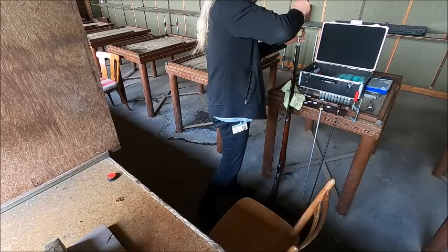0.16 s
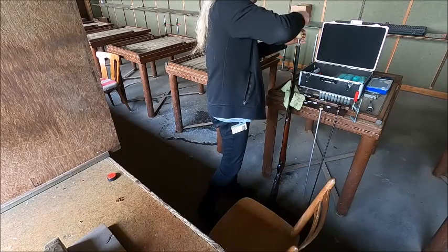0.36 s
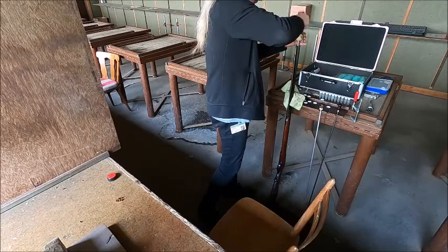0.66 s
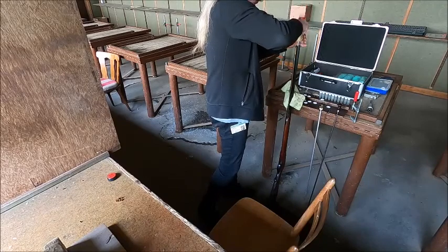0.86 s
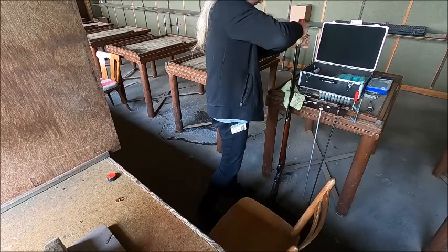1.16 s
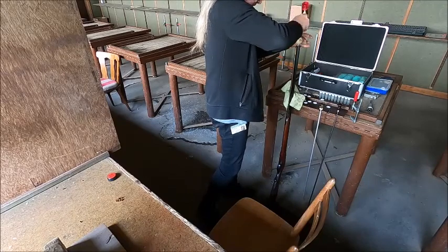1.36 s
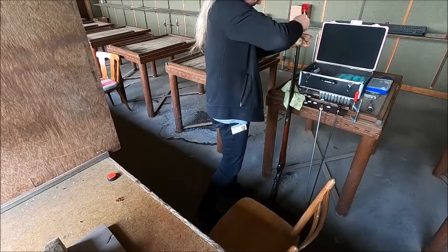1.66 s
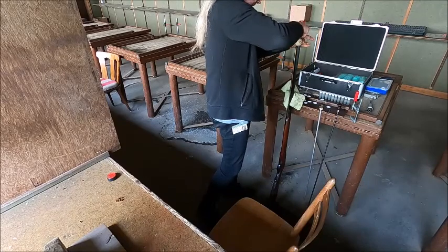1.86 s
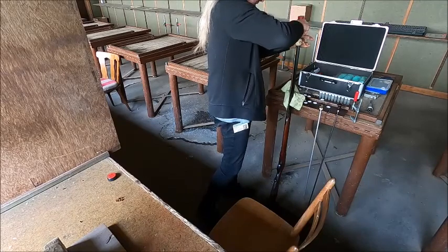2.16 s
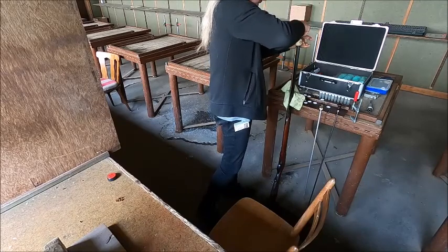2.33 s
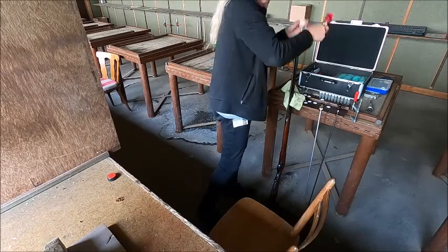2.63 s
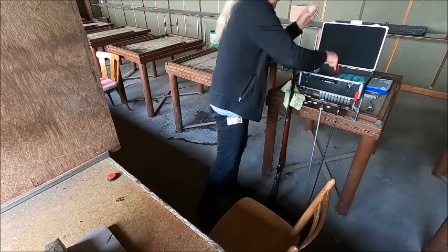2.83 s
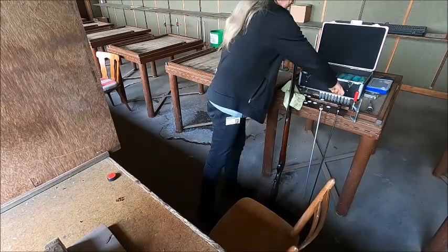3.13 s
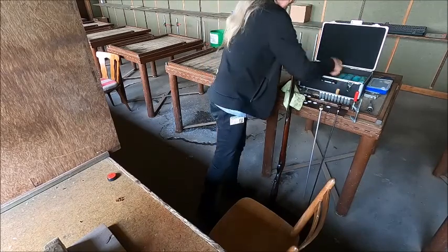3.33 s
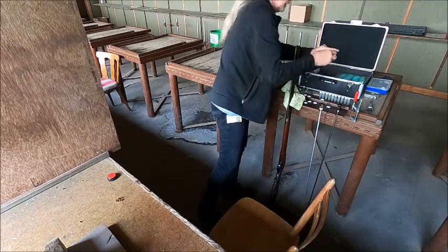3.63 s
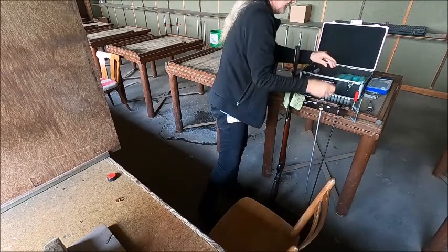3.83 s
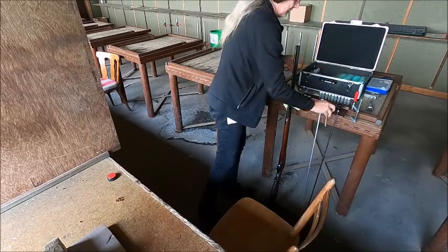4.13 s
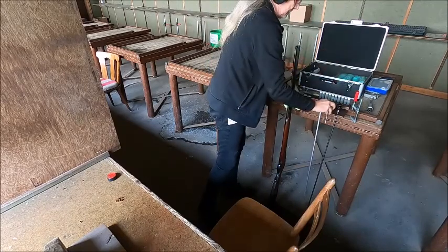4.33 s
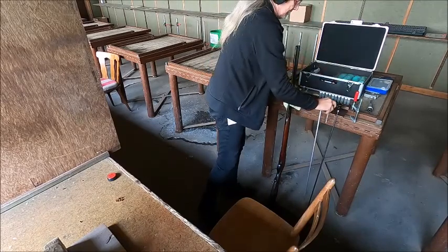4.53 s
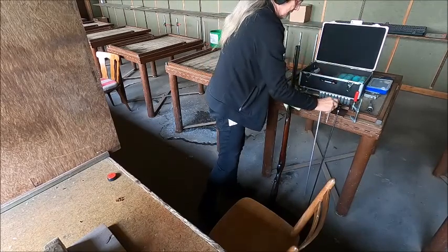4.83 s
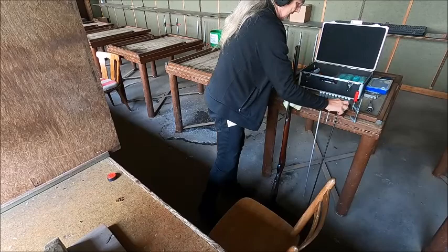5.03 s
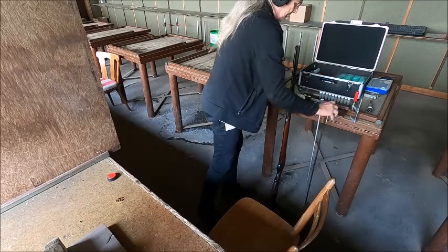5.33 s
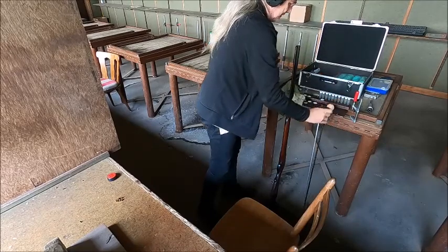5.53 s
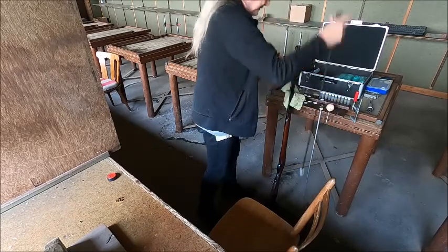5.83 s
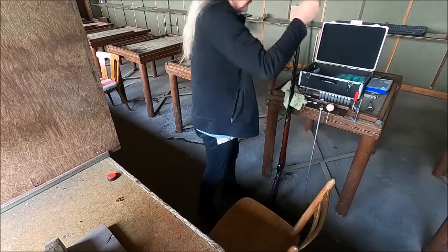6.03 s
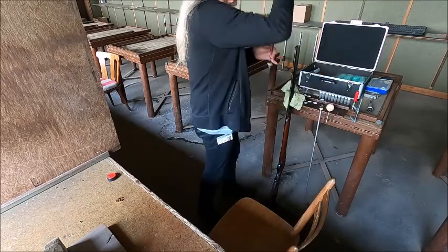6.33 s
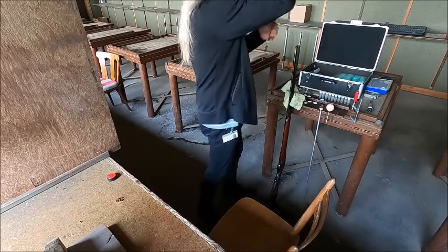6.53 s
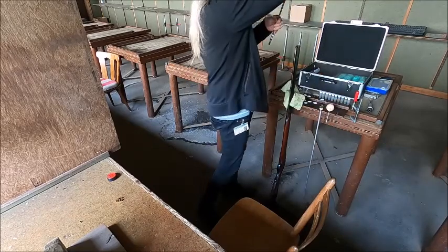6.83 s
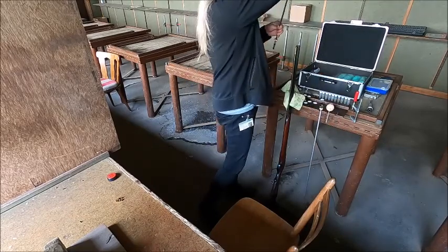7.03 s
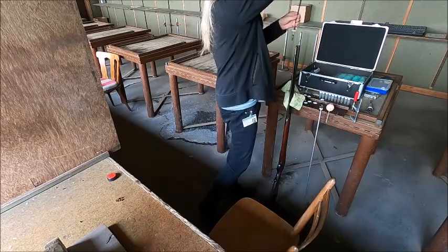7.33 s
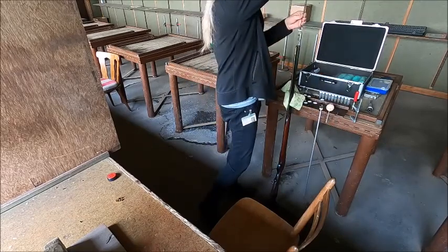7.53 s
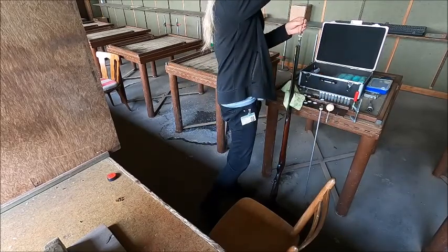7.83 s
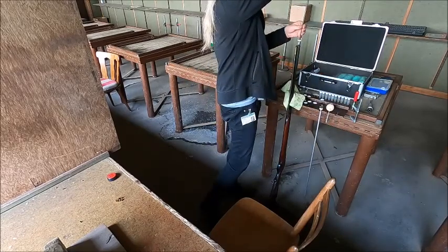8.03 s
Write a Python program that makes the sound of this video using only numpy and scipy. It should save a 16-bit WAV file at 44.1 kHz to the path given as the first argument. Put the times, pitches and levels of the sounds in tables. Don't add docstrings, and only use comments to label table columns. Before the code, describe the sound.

In a quiet wooden shed, a steady run of sharp knocks sinks in pitch, followed by a tool drop, loud lid clap, and light metallic clinks.

```python
import sys
import numpy as np
from scipy import signal
from scipy.fft import rfft, irfft, next_fast_len
from scipy.io import wavfile
from scipy.ndimage import uniform_filter1d

SR = 44100
rng = np.random.default_rng(int(sys.argv[2]) if len(sys.argv) > 2 else 0)


def put_to_file(sound):
    columns = np.atleast_2d(sound).T
    safe = np.clip(columns, -1, 1)
    whole_steps = np.round(safe * 32767)
    wavfile.write(sys.argv[1], SR, whole_steps.astype(np.int16))


def makeup_ratio(level_db):
    decades = np.asarray(level_db, float) / 20
    return 10 ** decades


N = 360278
LEAD = SR // 5

# (time [s], peak level [dB], knock pitch [Hz], thud level [dB], brightness [dB])
TAPS = [
    (0.1702, -13.5, 1614, -21, 7.5),
    (0.4556, -14, 1605, -33, 9),
    (0.749, -13.5, 1914, -21.5, 6),
    (1.0345, -14, 1700, -31, 4.5),
    (1.3243, -12, 1980, -14.5, 5),
    (1.6245, -20.5, 1590, -3, 15),
    (1.9166, -17, 2010, -9, 9),
    (2.3654, -12.5, 2020, -8, 3.5),
]
DROPS = [
    (3.3444, -16.5, 455, 20, 3.5),
    (3.379, -35.5, 452, 13.5, 14),
    (3.41, -33.5, 460, -1.5, 7.5),
]
LID_BLOWS = [
    (3.8526, -4.5, 2739, -15, 5),
    (3.908, -27.5, 2320, -20, 12),
    (3.926, -13, 1000, -12.5, -5),
]
KNOCKS = [
    (4.263, -21, 730, 1.5, 3.5),
    (4.308, -36, 670, -12, 13),
    (4.318, -40.5, 905, -12, 17.5),
    (4.4947, -24.5, 1400, -8, 3.5),
    (4.65, -32, 1062, 0.5, 3.5),
    (4.701, -48, 674, -13, 2),
    (5.3256, -25, 1500, -3, 3),
    (5.359, -34.5, 980, -3, 10),
    (5.385, -43.5, 400, 5, -9),
]


def unit(x):
    return x / np.sqrt(np.mean(x ** 2))


def band(x, lo_hz, hi_hz):
    sos = signal.butter(2, [lo_hz, min(hi_hz, SR / 2.2)], "band", fs=SR, output="sos")
    return signal.sosfilt(sos, x)


def fade(t, t60):
    return np.exp(-np.log(1000) * t / t60)


def coloured(shape, count):
    hz, db = np.transpose(shape)
    size = next_fast_len(count)
    f = np.arange(size // 2 + 1) * SR / size + 0.00085
    gain = makeup_ratio(np.interp(np.log(f), np.log(hz), db, -90, -90))
    return unit(irfft(rfft(rng.standard_normal(size)) * gain, size)[:count])


def pair(mid, side, alike):
    alike = np.clip(alike, 0, 1)
    opposed = np.sqrt((1 - alike) / 2) * side * np.array([[1], [-1]])
    return np.sqrt((1 + alike) / 2) * mid + opposed


def add(track, s, sound):
    i = int(s * SR) + LEAD
    track[i:i + len(sound)] += sound[:len(track) - i]


def walk(rate):
    k = int(SR / rate)
    steps = np.repeat(rng.standard_normal(N // k + 1), k)
    return unit(uniform_filter1d(uniform_filter1d(steps, k), k)[:N])


def swells(base_db, rows):
    power, t = np.full(N, makeup_ratio(base_db) ** 2), np.arange(N) / SR
    for s, db, rise in rows:
        span = slice(max(int(s * SR), 0), int((s + 9 * rise) * SR))
        u = (t[span] - s) / rise
        power[span] += (makeup_ratio(db) * u * np.exp(1 - u)) ** 2
    return np.sqrt(power)


def jolts(tap_db, drop_db, knock_db):
    tap_rise_s, drop_rise_s = 0.049, 0.02
    taps = [(s, db + tap_db, tap_rise_s) for s, db, *_ in TAPS]
    drops = [(s, db + drop_db, drop_rise_s) for s, db, *_ in DROPS]
    knocks = [(s, db + thud_db + knock_db, tap_rise_s) for s, db, _, thud_db, _ in LID_BLOWS + KNOCKS]
    return taps + drops + knocks


def background():
    # (time [s], level [dB], rise [s])
    gusts = [
        (-.05, -46, .07),
        (6.12, -62, .05),
        (6.235, -48, .075),
        (3.0, -63, .07),
    ]
    # (frequency [Hz], level [dB per Hz])
    hum_shape = [(59, -43), (100, -12), (118, -21.5), (144, -1), (200, 0), (231, -10.5), (300, -9.5),
                 (402, -22), (437, -19), (553, -33.5), (700, -25.5), (910, -55), (1540, -120)]
    # (frequency [Hz], level [dB per Hz])
    hiss_shape = [(240, -31), (400, 2), (545, -7), (848, -8), (1020, -3.5), (1390, -4), (1750, -7.5),
                  (3340, -9.5), (3870, -12.5), (4610, -12), (7270, -18.5), (8540, -25.5), (9900, -32.5),
                  (12900, -42.5), (21800, -120)]
    air_shape = [(15, -16.5), (35, -1.5), (75, 1), (120, -16.0), (200, -44)]  # (Hz, dB)

    def both(shape, alike):
        return pair(coloured(shape, N), coloured(shape, N), alike)

    air_gain = swells(-69.5, gusts + jolts(-41.5, -21, -48)) * makeup_ratio(1.8 * walk(12))
    hum_gain = swells(-65, jolts(-36.5, -34, -62)) * makeup_ratio(2 * walk(22))
    hiss_gain = makeup_ratio(-68.5 + 1.4 * walk(3.3))
    air = air_gain * both(air_shape, 0.85) * makeup_ratio([[1.6], [-1.6]])
    return air + hum_gain * both(hum_shape, 0.71) + hiss_gain * both(hiss_shape, 0.24)


def click(colour, bright_db, corner_hz):
    hz, db = np.transpose(colour)
    f = np.arange(513) * SR / 1024 + 1
    db = np.maximum(np.interp(np.log(f), np.log(hz), db), -70) + bright_db / (1 + (corner_hz / f) ** 3)
    cepstrum = irfft(np.log(makeup_ratio(db)))[:513] * np.r_[1, 2 * np.ones(511), 1]
    return irfft(np.exp(rfft(cepstrum, 1024)))


def spread(x, hz):
    width_hz = 900
    r = np.exp(-np.pi * width_hz / SR)
    c = -2 * r * np.cos(2 * np.pi * hz / SR)
    return signal.sosfilt([[r * r, c, 1, 1, c, r * r]], x)


def uncoloured(x):
    tone = rfft(x)
    fold = np.r_[1, 2 * np.ones(len(x) // 2 - 1), 1]
    cepstrum = irfft(np.log(np.abs(tone) + 1e-9))[:len(fold)] * fold
    return irfft(tone / np.exp(rfft(cepstrum, len(x))), len(x))


def blows(rows, modes, colour, knock_s, click_db, corner_hz, grit, grit_s, thud_hz, thud_s, trim_db):
    force_db = 2
    track, t = np.zeros(N + LEAD), np.arange(SR // 2) / SR
    short = t[:SR // 6]
    brief = short[:2048]
    for s, db, knock_hz, thud_db, bright_db in rows:
        chance = rng.standard_normal((len(modes), 2))
        noise = rng.standard_normal((2, len(short)))
        attack = 1 - np.exp(-t * knock_hz * 0.78)
        sound = np.sin(2 * np.pi * knock_hz * t) * attack * fade(t, knock_s)

        for (hz, mode_db, t60), (pitch, force) in zip(modes, chance):
            between = sum(min(hz, knock_hz) < other < max(hz, knock_hz) for other, *_ in modes)
            gain = -(-1) ** between * makeup_ratio(mode_db + force_db * force)
            sound += gain * np.sin(2 * np.pi * hz * (1 + 0.008 * pitch) * t) * fade(t, t60)

        contact = (brief == 0) + grit * noise[0, :len(brief)] * fade(brief, grit_s)
        contact = uncoloured(contact) * fade(brief, 4 * grit_s)
        plain = np.sqrt(np.sum(click(colour, 0, corner_hz) ** 2) * np.sum(contact ** 2))
        burst = signal.fftconvolve(spread(contact, knock_hz), click(colour, bright_db, corner_hz))
        sound[:len(burst)] += makeup_ratio(click_db) / plain * burst

        thud = unit(band(noise[1], *thud_hz)) * (1 - np.exp(-short / 0.0079)) * fade(short, thud_s)
        sound[:len(short)] += makeup_ratio(thud_db + 1) * thud
        add(track, s, makeup_ratio(db + trim_db) * sound)
    return track


def starter():
    # (time [s], peak level [dB], knock pitch [Hz], thud [dB], brightness [dB])
    earlier_tap = [
        (-.12, -13.5, 3800, -5.5, 0.0074),
    ]
    # (frequency [Hz], level [dB], t60 [s])
    starter_modes = [(1287, -28, 0.078), (1614, -16.5, 0.012), (2010, -23, 0.028), (2370, -11.5, 0.027),
                     (2800, 0, 0.0038)]
    # (frequency [Hz], level [dB])
    tap_colour = [(240, -58), (400, -28.5), (1240, -5), (1600, 0), (2050, -1.5), (2450, -11), (3050, -10),
                  (3500, -16.5), (4500, -16.5), (7670, -20), (9900, -30), (12900, -62.5), (21800, -120)]
    # (share of the ring pitch [1], level [dB])
    ring_skirt = [(0.82, -17), (1.0, -9.5), (1.1, -7.5)]
    first_ring_hz, last_ring_hz = 1023, 770
    track, rows = 0, earlier_tap + TAPS
    for row, depth in zip(rows, np.linspace(0, 1, len(rows))):
        ring_hz = first_ring_hz + (last_ring_hz - first_ring_hz) * depth ** 2.8
        ring = (ring_hz, -18.5 - 12 * depth, 0.031)
        stock = [(hz, db + 14 * depth * (hz < 500)) for hz, db in tap_colour]
        skirt = [(share * ring_hz, db) for share, db in ring_skirt]
        track = track + blows([row], starter_modes + [ring], sorted(stock + skirt), knock_s=0.013,
                              click_db=13.07, corner_hz=2500, grit=0.06 + 0.5 * depth ** 2, grit_s=0.018,
                              thud_hz=(130, 800), thud_s=0.039, trim_db=-0.5)
    return track


def light_touches():
    # (time [s], peak level [dB], knock pitch [Hz], thud level [dB],
    # brightness [dB])
    ticks = [(0.0808, -44.5, 1730, 4, 1), (0.4015, -39.5, 1870, -28, -26.5), (0.635, -39, 2400, -20, -15.5),
             (1.2194, -62.5, 1902, 4, 20), (1.5763, -36.5, 3340, 8.5, -18), (1.8477, -47.5, 1560, -10, 10),
             (1.8737, -46, 2940, -4, -13), (2.6587, -30, 3070, -0.5, 1), (2.7034, -31, 2810, -15, 7.5),
             (2.7105, -32, 2140, -30, 0), (2.718, -35, 2500, -34, 4.5), (2.749, -30.5, 1870, -26, -2),
             (2.7555, -37, 4080, -25, 11), (2.7636, -36.5, 3630, -20, 11), (2.7714, -39.5, 3500, -19, 12),
             (2.779, -42.5, 5000, -19, 8), (3.7692, -41, 3080, -42, 6),
             (2.65, -34, 4630, -32, 4.5),
        (3.334, -39, 500, 18, -4),
        (3.844, -38.5, 2500, -15.5, -20.5),
        (6.467, -40.5, 2820, -31, 11),
        (3.3465, -17.5, 2850, -21, -20.5),
        (5.333, -51, 5500, -19, 22.5),
    ]
    # (frequency [Hz], level [dB])
    tick_colour = [(530, -42.5), (900, -18.5), (1270, -17), (1930, -4.5), (2330, -7), (3970, -5.5),
                   (4350, -10), (5590, -14.5), (9900, -24.5), (12900, -54.5), (21800, -120)]
    grazes = [(s - 0.0098, db - 26, 1900, -19, -10) for s, db, *_ in TAPS]
    return blows(ticks + grazes, [], tick_colour, knock_s=0.012, click_db=12, corner_hz=4500,
                 grit=1.2, grit_s=0.012, thud_hz=(200, 1200), thud_s=0.013, trim_db=-1.4)


def birds():
    # (time [s], length [s], start pitch [Hz], end pitch [Hz], level [dB])
    whistles = [(0.123, 0.14, 3280, 3240, -54), (2.563, 0.12, 5550, 5400, -72),
                (2.927, 0.11, 4490, 4530, -69), (4.066, 0.13, 3780, 3860, -67),
                (4.107, 0.32, 4100, 3560, -65.5), (4.424, 0.19, 3020, 3000, -62),
                (4.549, 0.14, 3380, 3500, -65), (4.596, 0.16, 3020, 2800, -66),
                (7.486, .27, 4290, 4250, -67.5), (7.709, 0.21, 7050, 6970, -76),
                (6.771, 0.078, 4570, 4330, -62), (7.89, 0.18, 3810, 3740, -68.5)]
    track = np.zeros(N + LEAD)
    for s, length, start_hz, end_hz, db in whistles:
        u = np.linspace(0, 1, int(length * SR))
        wobble = uniform_filter1d(rng.standard_normal(len(u)), 60)
        waver = 1 + 0.32 * (3500 / start_hz) ** 2 * wobble
        turn = 2 * np.pi * np.cumsum((start_hz + (end_hz - start_hz) * u) * waver) / SR
        add(track, s, makeup_ratio(db) * np.sin(np.pi * u) * np.sin(turn))
    return track


def wood_creaks():
    # (time [s], length [s], pitch [Hz], level [dB], overtone level [dB])
    creaks = [
        (1.666, 0.19, 406.4, -57, -27),
        (2.195, 0.068, 433, -61, 0),
        (3.013, 0.1, 565, -80, -13),
        (3.206, 0.13, 488, -65, -20.5),
    ]
    multiples_db = [0, -5, -16, -3, -16, -8]
    track = np.zeros(N + LEAD)
    for s, length, hz, db, over_db in creaks:
        u = np.linspace(0, 1, int(length * SR))
        wobble = uniform_filter1d(rng.standard_normal(len(u)), 300)
        turn = 2 * np.pi * np.cumsum(hz * (1 + 0.3 * wobble)) / SR
        tone = sum(makeup_ratio(g + over_db * (k > 0)) * np.sin((k + 1) * turn) for k, g in enumerate(multiples_db))
        add(track, s, makeup_ratio(db) * np.sin(np.pi * u) * tone)
    return track


def scrapes():
    # (time [s], length [s], level [dB])
    drags = [
        (2.648, 0.12, -54.5),
        (6.181, 0.051, -60),
        (6.449, .26, -66.5),
        (8.114, 0.052, -56),
    ]
    # (frequency [Hz], level [dB per Hz])
    drag_shape = [(300, 12), (600, -28), (1200, -9.5), (1900, 2.5), (3000, -7.5), (4500, 1.5), (7000, -6.5),
                  (10000, -16.5), (13000, -10.5), (16000, -47.5)]
    stop_s = 0.063
    track = np.zeros(N + LEAD)
    for s, length, db in drags:
        t = np.arange(0, length + stop_s, 1 / SR)
        slip_force = np.repeat(rng.exponential(size=len(t) // 60 + 1), 60)[:len(t)]
        slips = uniform_filter1d(makeup_ratio(3.49 * slip_force), 40)
        press_db = np.interp(t, [0, length, length + stop_s], [0, 0, -35])
        add(track, s, makeup_ratio(db + press_db - 4.0) * unit(slips * coloured(drag_shape, len(t))))
    return track


def bench_drops():
    # (frequency [Hz], level [dB], t60 [s])
    bench_modes = [(105.8, 11, 0.17), (170.5, 6, 0.197), (203, -7.5, 0.96), (205.4, 12.5, 0.12),
                   (249, 12.5, 0.11), (327, -1, 0.14), (350, -0.5, 0.13), (405, -5.5, .12), (455.8, 7, 0.2),
                   (563, -9, 0.026), (893, -8, .04), (1256, -32.5, 1)]
    # (frequency [Hz], level [dB])
    drop_colour = [(240, -21.5), (400, -13.5), (457, -5.5), (640, -16), (1000, -14), (1500, -20),
                   (2140, -24), (2960, -30.5), (5630, -34.5), (9900, -57.5), (12900, -91.5), (21800, -120)]
    return blows(DROPS, bench_modes, drop_colour, knock_s=0.021, click_db=33.55, corner_hz=1800,
                 grit=0.16, grit_s=0.035, thud_hz=(140, 400), thud_s=0.045, trim_db=-14)


def lid_blows():
    # (frequency [Hz], level [dB], t60 [s])
    lid_modes = [(223.2, -33, 0.1), (446, -15.5, 0.021), (856, -13.5, 0.049), (1190, -43, 0.86),
                 (1335, -23, 0.02), (2174, -6, 0.034), (2750, -22.5, 0.026), (3840, -23, 0.02),
                 (4760, -32, .02)]
    # (frequency [Hz], level [dB])
    lid_colour = [(180, -49.5), (300, -11), (848, 4), (1300, 2.5), (1700, -1.5), (2400, 9.5), (3300, -7),
                  (4760, -13), (6500, -27), (9900, -54), (12900, -70), (21800, -120)]
    return blows(LID_BLOWS, lid_modes, lid_colour, knock_s=0.014, click_db=16.2, corner_hz=2540,
                 grit=0.25, grit_s=0.019, thud_hz=(160, 600), thud_s=0.072, trim_db=-11.5)


def case_knocks():
    # (frequency [Hz], level [dB], t60 [s])
    case_modes = [(225, -26.5, 0.18), (296, -20.5, 0.037), (420, -8.5, 0.042), (850, -24, 0.029),
                  (1062, -22, 0.04), (1310, -16.5, 0.015)]
    # (frequency [Hz], level [dB])
    knock_colour = [(180, -30), (300, -7), (848, 5.5), (1120, 5), (1280, 5), (1570, 2.5), (2190, -5),
                    (2770, -7), (3300, -10), (4760, -15), (9900, -39), (12900, -69), (21800, -120)]
    return blows(KNOCKS, case_modes, knock_colour, knock_s=0.014, click_db=15.8, corner_hz=1800,
                 grit=0.25, grit_s=0.041, thud_hz=(160, 600), thud_s=0.06, trim_db=-13.0)


def rod_clinks():
    # (time [s], peak level [dB], knock pitch [Hz], thud level [dB], brightness [dB])
    clinks = [(5.6151, -55, 5100, -15.5, 20), (5.8434, -47.5, 5760, -27, -6),
              (6.1604, -54.5, 5640, -18.5, 15), (6.2078, -46, 5420, -11, 9.5), (6.2292, -45, 2750, -2, -9),
              (6.3021, -35, 5250, -17, -3), (6.359, -46, 5400, -5, -14), (6.4792, -31.5, 5530, -29, -4),
              (6.545, -37.5, 5600, -5, 5), (6.6004, -60, 4620, 12.5, 24), (6.6683, -60, 4770, 0, 0),
              (6.7777, -42, 4280, -42, -23), (6.8423, -39, 5600, -13, -19),
              (7.3033, -48.5, 5465, -10.5, -11), (7.4304, -58.5, 4130, -22, 6.5),
              (7.5444, -54.5, 4270, -11, 10.5)]
    # (frequency [Hz], level [dB], t60 [s])
    rod_modes = [(1477, -28, 0.039), (3280, -25, 0.051), (4910, -15, 0.029), (5500, -26, 0.05),
                 (7700, -42, 0.12)]
    # (frequency [Hz], level [dB])
    clink_colour = [(530, -47), (900, -60), (1490, -16), (2710, -9.5), (3450, -7), (4260, -6.5),
                    (5480, -5.5), (6760, -7), (8870, -11.5), (9900, -20.5), (12900, -24), (21800, -120)]
    return blows(clinks, rod_modes, clink_colour, knock_s=0.0084, click_db=7.6, corner_hz=8500,
                 grit=0.75, grit_s=0.025, thud_hz=(900, 3000), thud_s=0.019, trim_db=4.9)


def rod_seating():
    # (time [s], peak level [dB], knock pitch [Hz], thud level [dB], brightness [dB])
    seating = [
        (7.9838, -40, 1940, 6.5, -9),
        (8.076, -28.5, 1900, -27, -8.5),
        (8.1174, -34, 3515, -25, 3),
        (8.1318, -22.5, 2203, -36, 7.5),
        (8.1444, -34, 1500, -21, -10),
    ]
    # (frequency [Hz], level [dB], t60 [s])
    barrel_modes = [(415, -24, 0.2), (1000, -31.5, 0.14), (1500, -32.5, 0.1), (1870, -38, 0.097),
                    (2050, -18, 0.057), (2500, -28, 0.058), (2840, -19, 0.027), (3780, -12, 0.076),
                    (7600, -22, 0.042)]
    # (frequency [Hz], level [dB])
    seat_colour = [(240, -47), (400, -15), (793, -20.5), (1470, 1.5), (1730, 0), (1870, -17), (2690, 3.5),
                   (3720, -4), (6710, -17), (9900, -72), (12900, -74), (21800, -120)]
    return blows(seating, barrel_modes, seat_colour, knock_s=0.037, click_db=14.4, corner_hz=4600,
                 grit=0.3, grit_s=0.0333, thud_hz=(200, 1000), thud_s=0.014, trim_db=-8.5)


def ports(x):
    # (frequency [Hz], left lead [rad], left minus right [dB])
    port_table = [(0, 0, 2), (150, -.3, .4), (520, -.45, .3), (1200, -.65, .2), (2500, -.9, 1.4),
                  (4900, -1.4, -.6), (6500, -1.8, -1.2), (9000, -2.0, -1.6), (15000, -2.0, -1.2)]
    hz, lead, db = np.transpose(port_table)
    f = np.arange(x.shape[1] // 2 + 1) * SR / x.shape[1]
    left = np.sqrt(makeup_ratio(np.interp(f, hz, db)) * np.exp(1j * np.interp(f, hz, lead)))
    return irfft(rfft(x) * np.array([left, 1 / left]), x.shape[1])


def shed(wet_db, linger, echo_db):
    # (frequency [Hz], t60 [s], build-up [s], level [dB], share alike at both ports [1])
    tail = [(90, .55, .04, -3.5, 0.46), (194, 0.53, 0.026, 4.5, 1), (390, 0.54, 0.0089, -3, 0.89),
            (820, 0.56, 0.011, -1.5, 0.92), (1400, 0.43, 0.0046, -5, 1), (2800, 0.4, 0.0056, -11, .93),
            (5600, 0.28, 0.0044, -10.5, 0.48), (11000, 0.17, 0.0034, -11.5, 0.45)]
    # (delay [s], level [dB])
    echoes = [
        (.003, 0),
        (.005, -5),
        (.0145, -15),
    ]
    t = np.arange(2 ** 15) / SR
    near = np.zeros(len(t))
    near[64] = 1
    near[[64 + int(s * SR) for s, _ in echoes]] = makeup_ratio([db + echo_db for _, db in echoes])
    near[:128] = signal.sosfilt(signal.butter(1, 3500, fs=SR, output="sos"), near[:128])

    answer, table = np.array([near, near]), np.transpose(tail)
    for hz in 80 * np.sqrt(2) ** np.arange(16):
        t60, build, db, alike = (np.interp(np.log(hz), np.log(table[0]), column) for column in table[1:])
        mid, side = band(rng.standard_normal((2, len(t))), hz / 2 ** 0.25, hz * 2 ** 0.25)
        rise = 1 - np.exp(-(np.maximum(t - 0.003, 0) / build) ** 2)
        answer += makeup_ratio(db + wet_db) * pair(mid, side, alike) * rise * fade(t, t60 * linger)
    return ports(answer)


def heard(dry, wet_db, linger, echo_db):
    wet = signal.fftconvolve(band(dry, 65, 20000)[None], shed(wet_db, linger, echo_db), axes=1)
    return wet[:, LEAD + 40:LEAD + 40 + N]


def scene():
    muzzle = starter() + rod_seating()
    hands = light_touches() + birds() + wood_creaks() + scrapes() + rod_clinks()
    case = lid_blows() + case_knocks()
    mix = background()
    mix = mix + heard(muzzle, wet_db=-19.5, linger=0.84, echo_db=0)
    mix = mix + heard(hands, wet_db=-21.0, linger=0.7, echo_db=-2.4)
    mix = mix + heard(bench_drops(), wet_db=-21, linger=0.68, echo_db=-6)
    return mix + heard(case, wet_db=-18, linger=0.64, echo_db=-2)


def roll_off(x):
    return signal.sosfilt(signal.butter(12, 15300, fs=SR, output="sos"), x)


def record(dry):
    dull = signal.sosfilt(signal.butter(2, 13000, fs=SR, output="sos"), dry)
    return roll_off(dull)


dry = scene()
out = record(dry)
put_to_file(out)
```